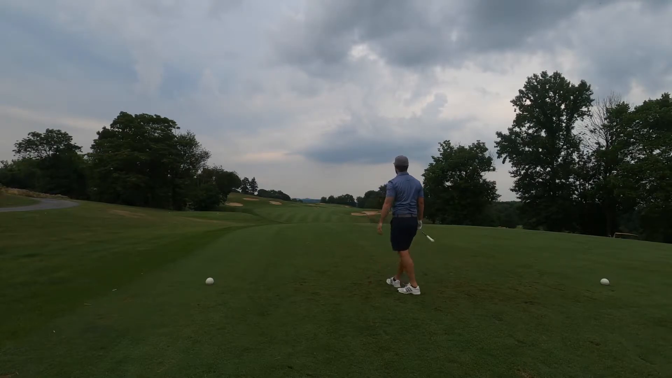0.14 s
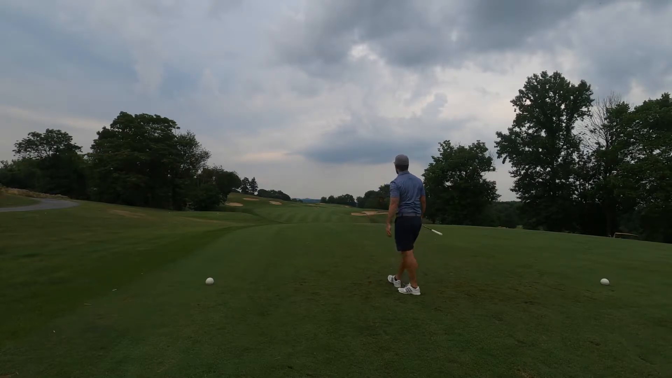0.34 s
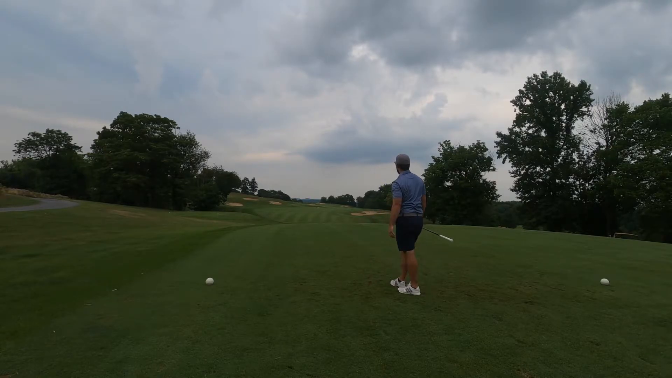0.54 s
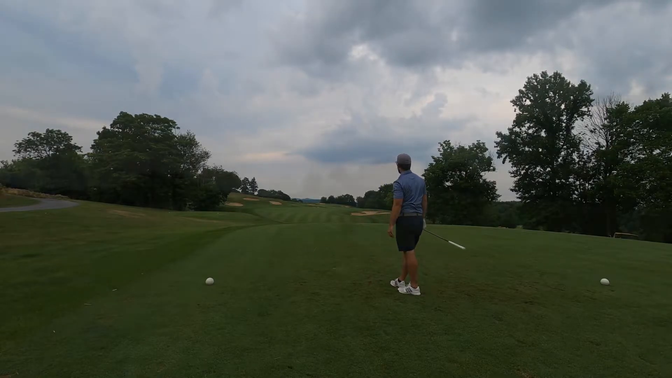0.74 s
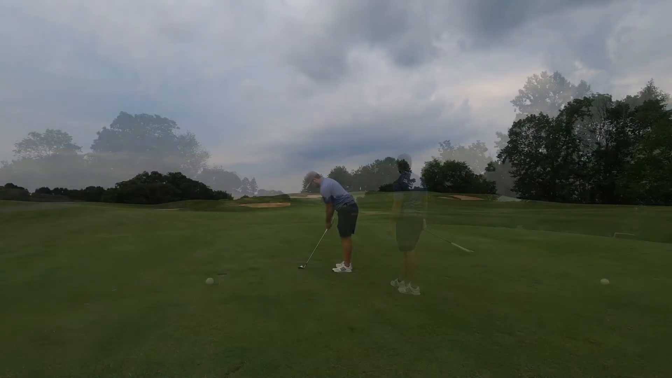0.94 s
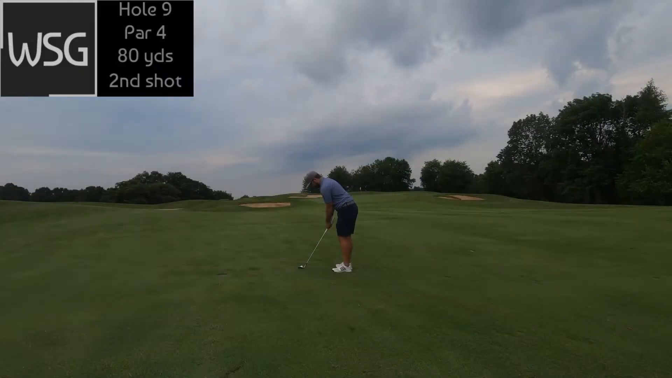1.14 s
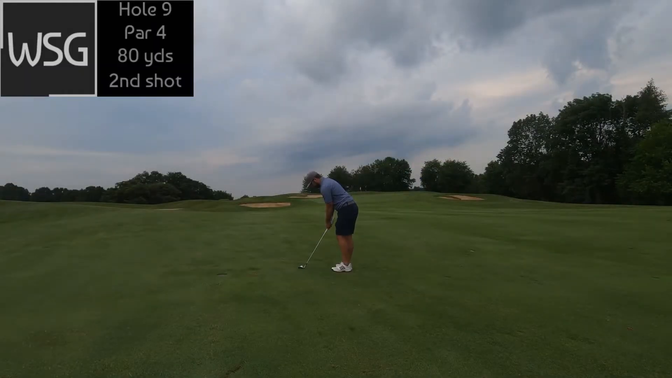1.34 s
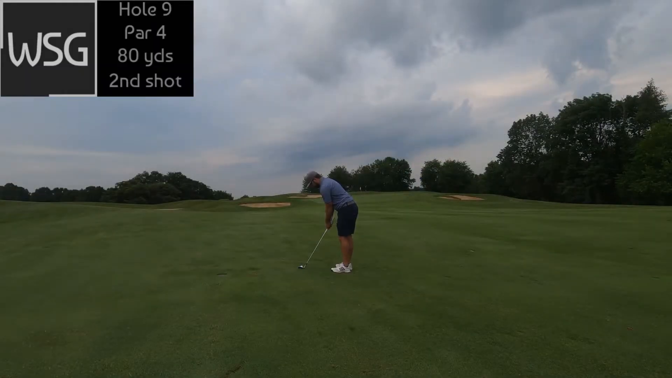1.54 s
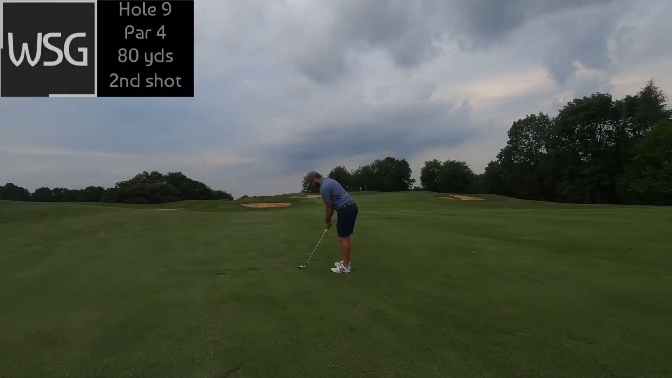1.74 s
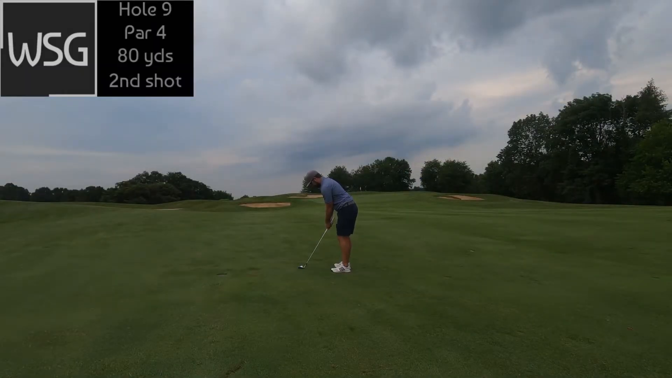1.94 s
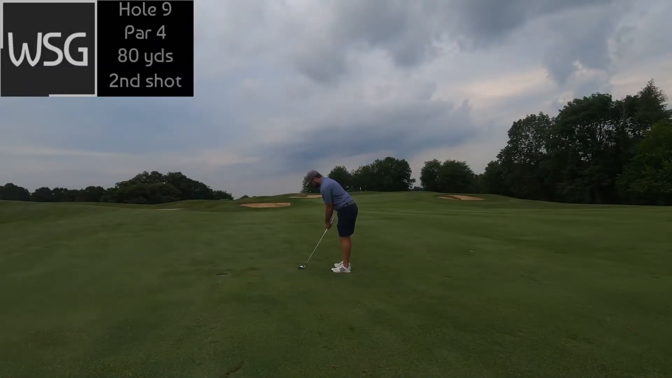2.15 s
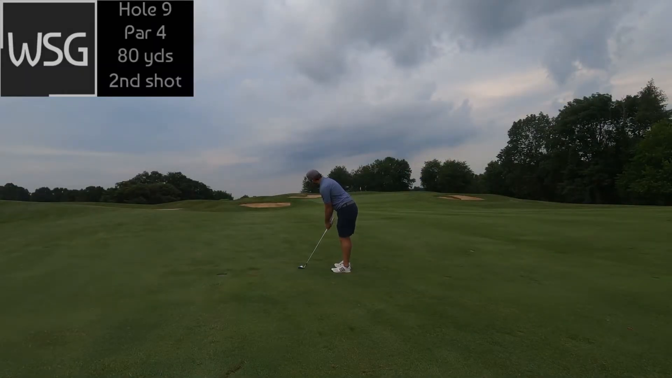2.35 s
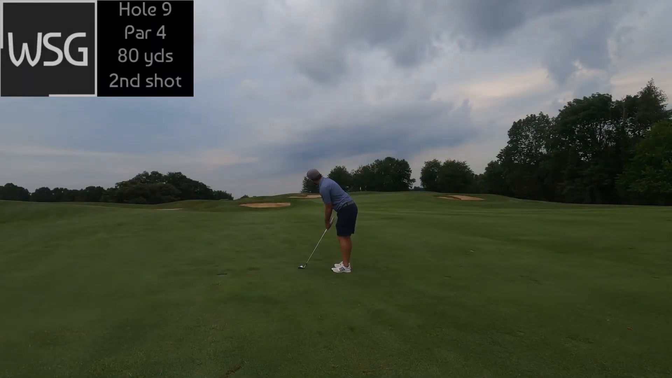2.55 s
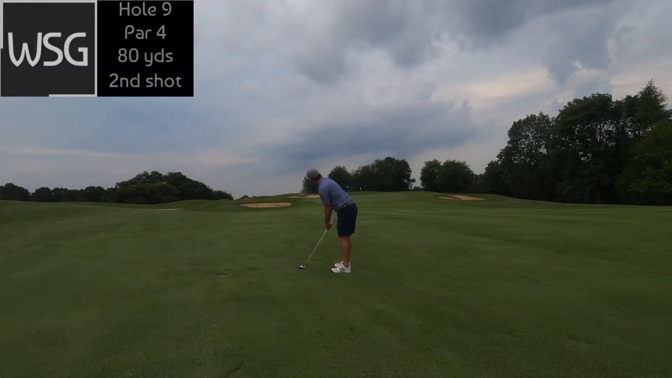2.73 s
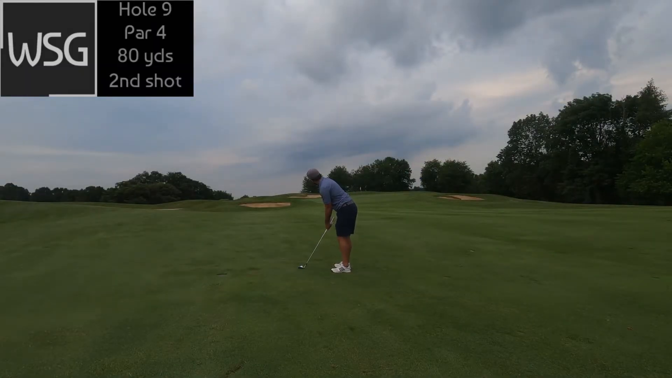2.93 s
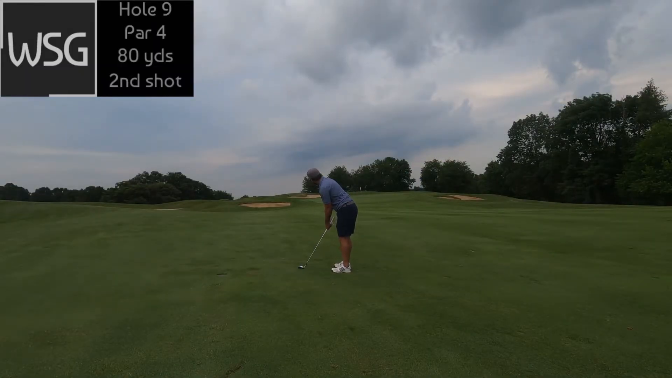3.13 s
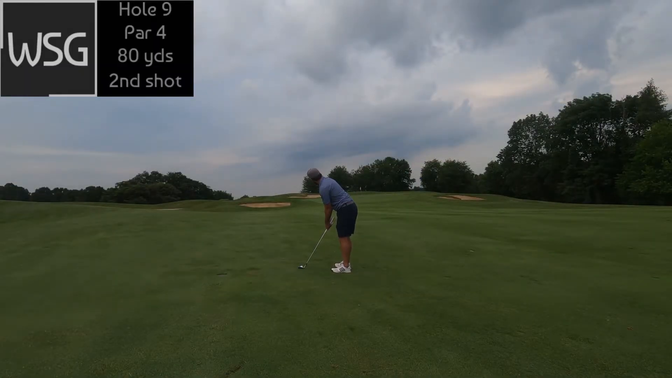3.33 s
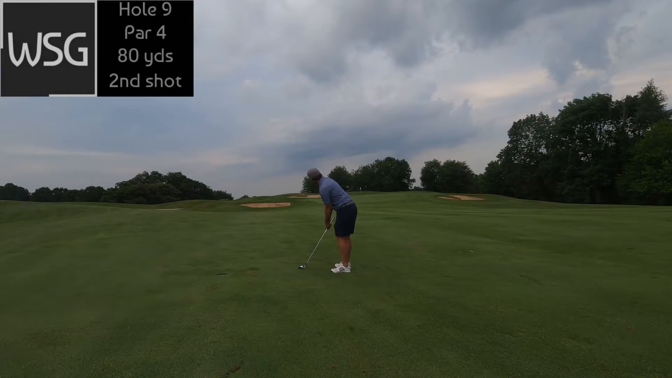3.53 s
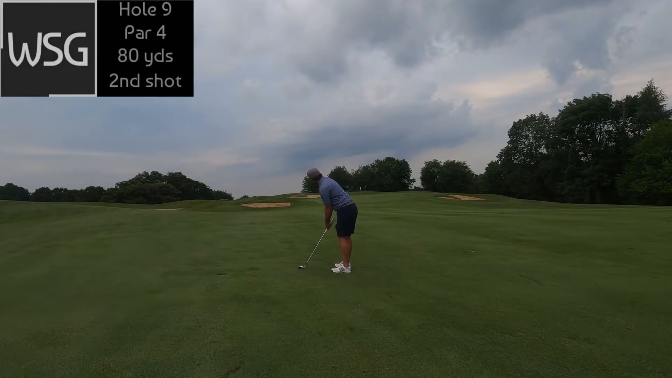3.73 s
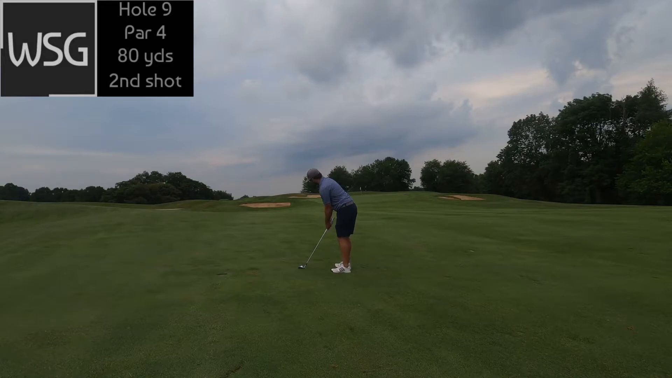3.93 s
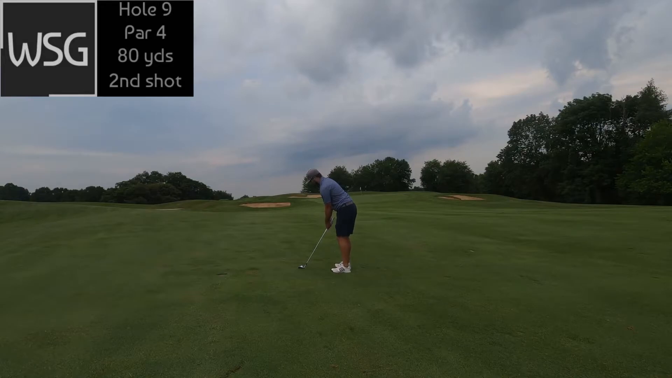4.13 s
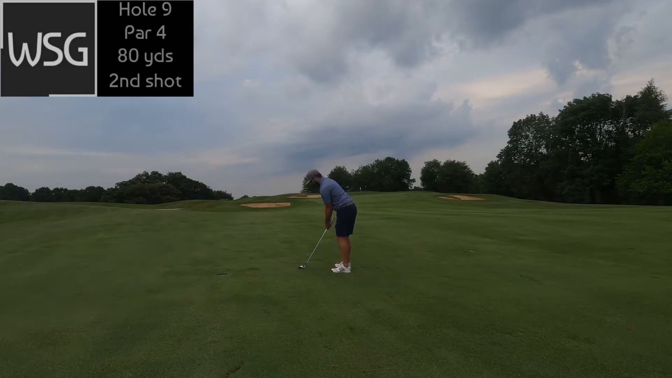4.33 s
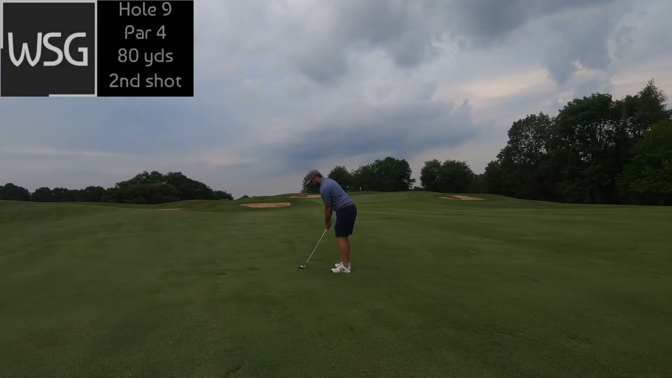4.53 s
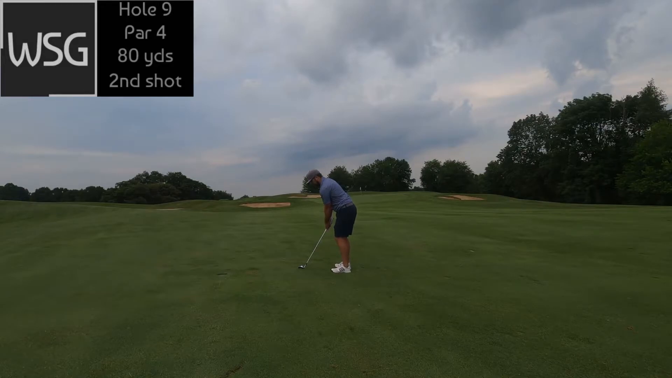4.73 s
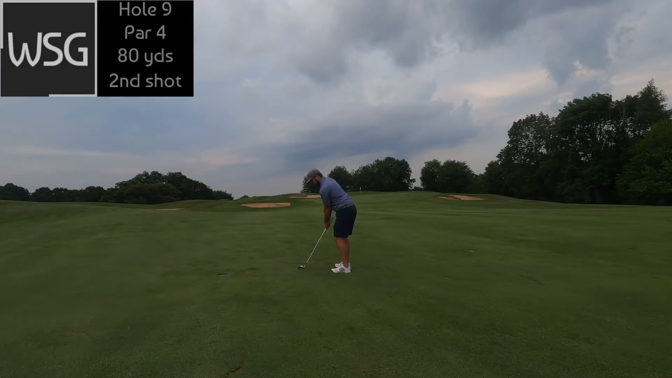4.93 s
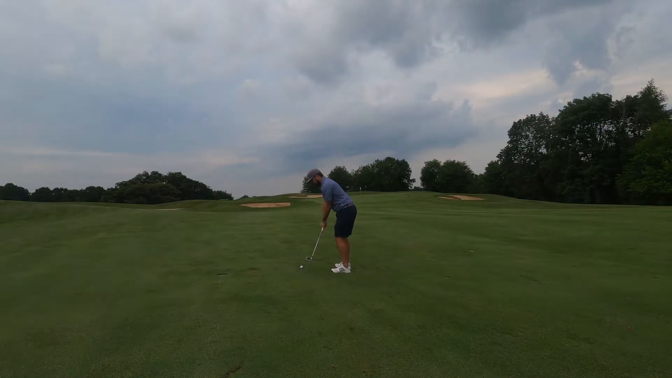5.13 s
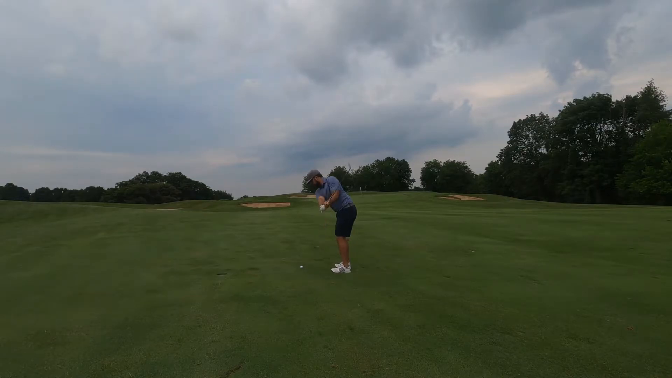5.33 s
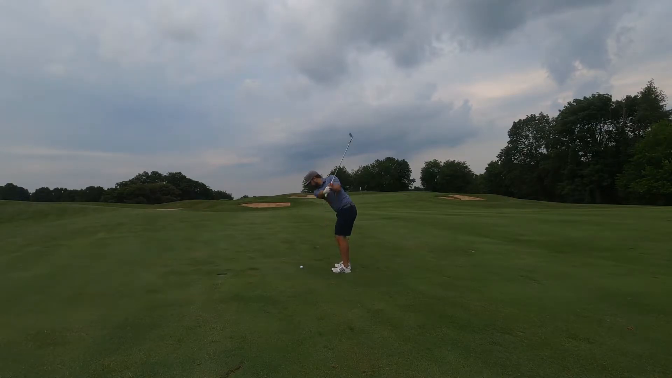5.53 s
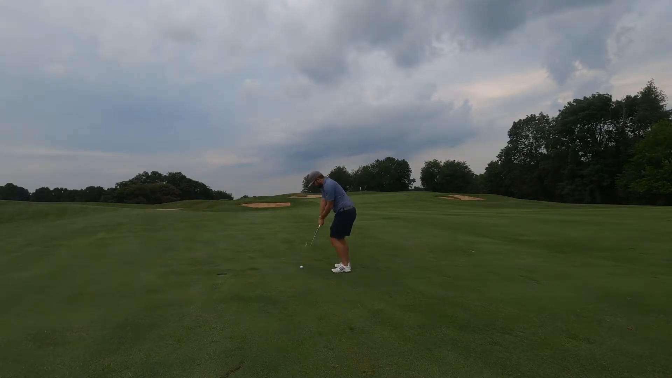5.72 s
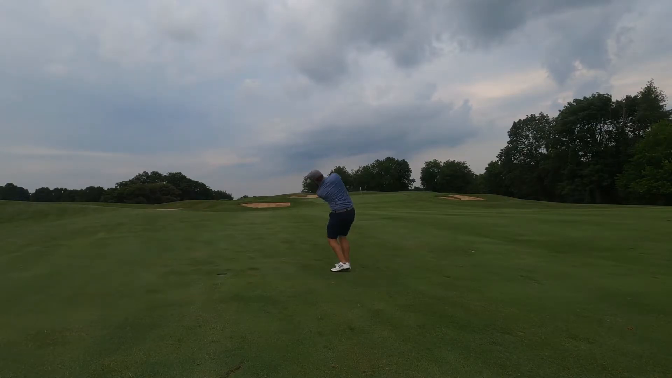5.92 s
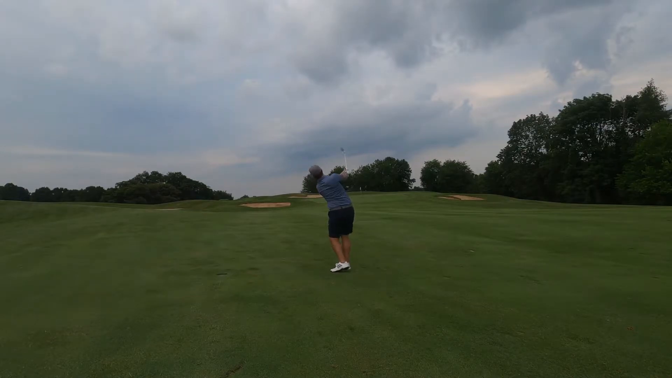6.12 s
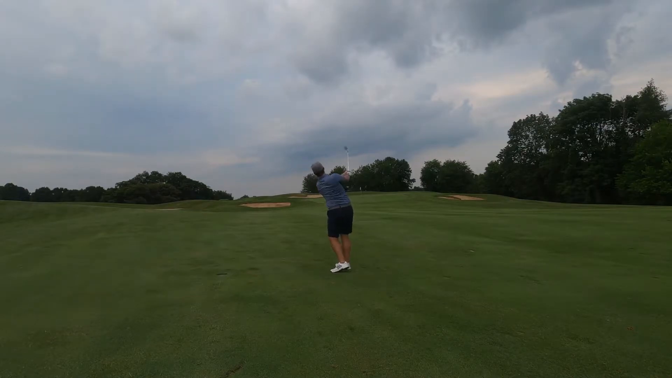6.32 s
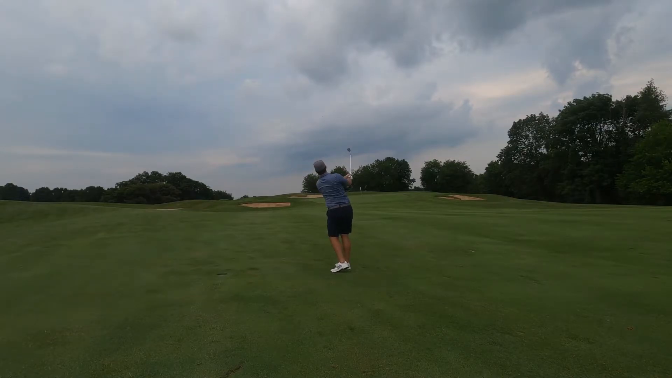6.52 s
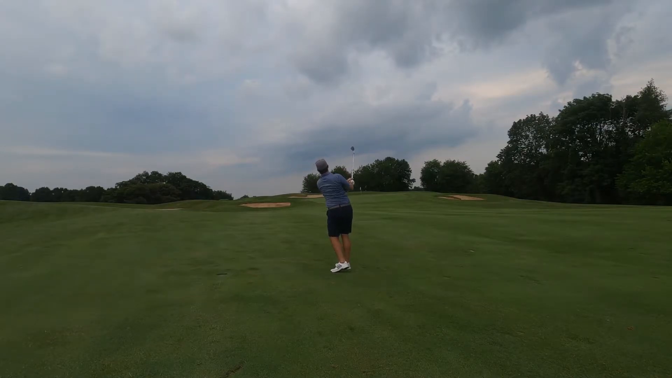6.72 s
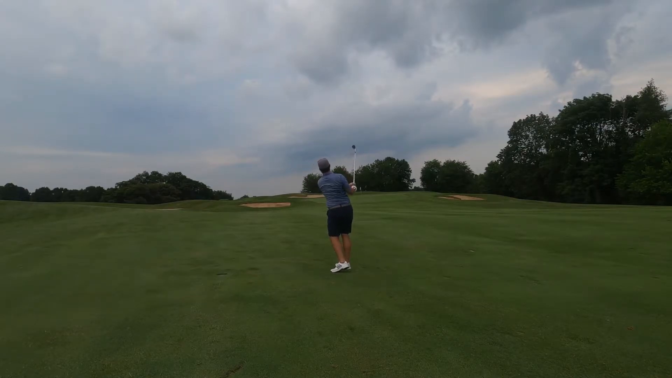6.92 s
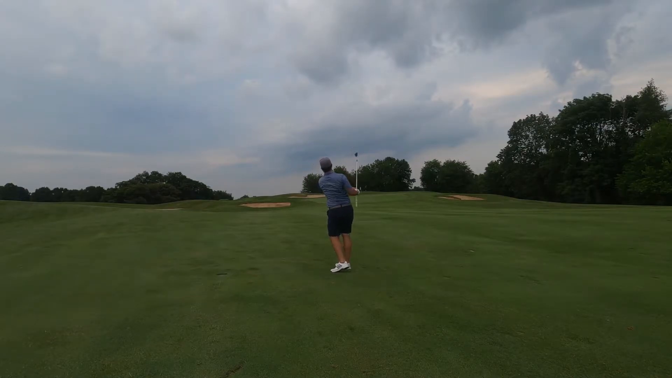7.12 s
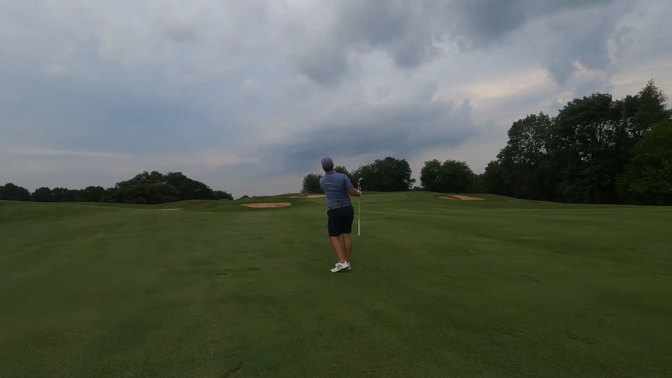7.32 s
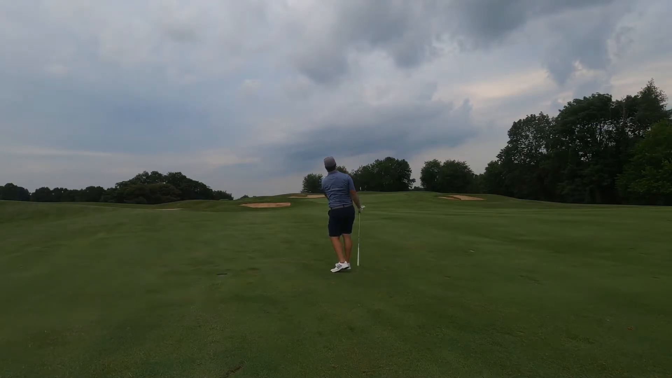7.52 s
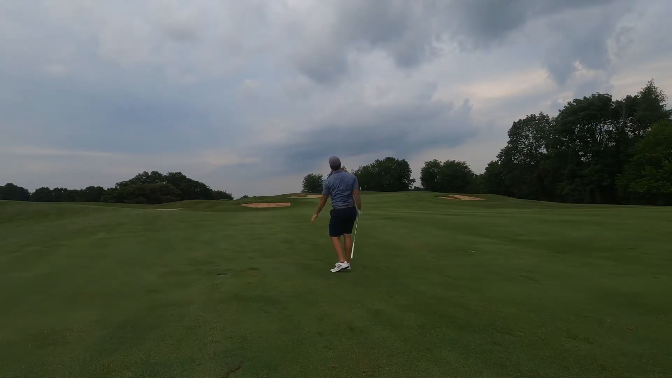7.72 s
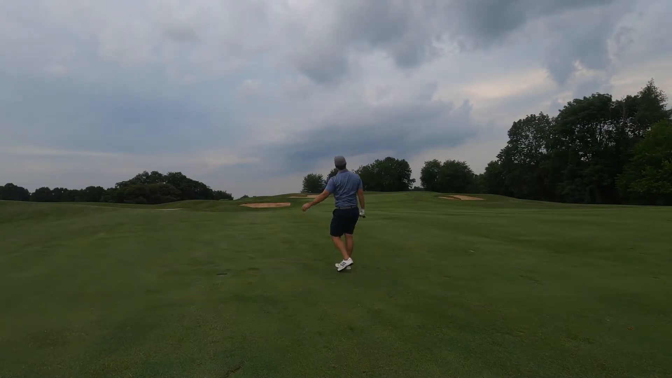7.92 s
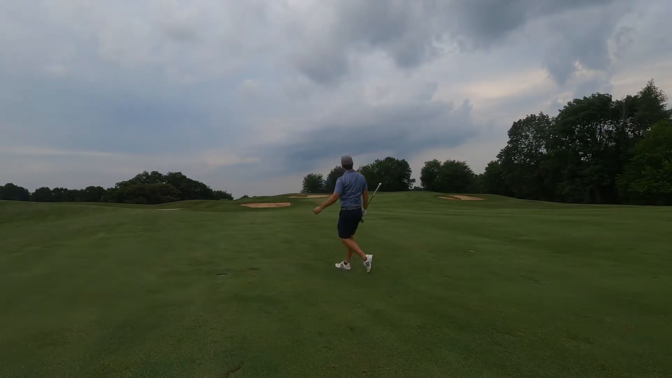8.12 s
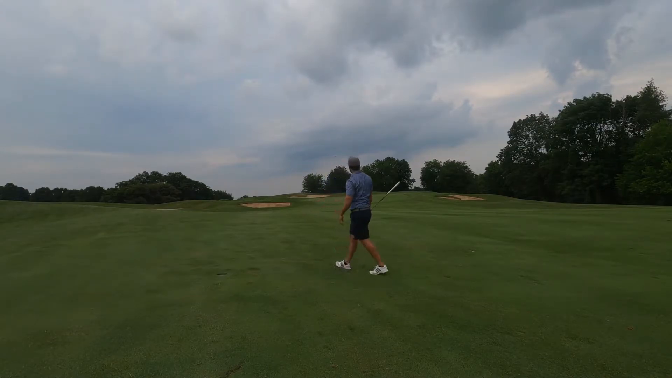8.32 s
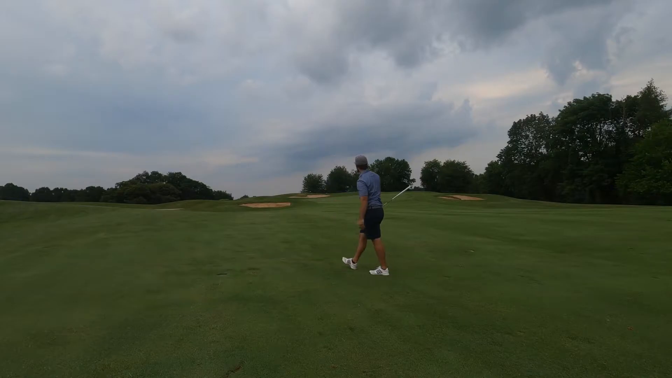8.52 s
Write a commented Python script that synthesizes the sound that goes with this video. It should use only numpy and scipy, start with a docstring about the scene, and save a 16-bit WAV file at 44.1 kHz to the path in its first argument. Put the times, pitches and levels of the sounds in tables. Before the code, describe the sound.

Low microphone wind and distant engine drone, sparse bird calls, then one sharp golf shot with a short turf thud and soft brushing afterward.

```python
"""An iron swishes down, strikes the golf ball with one crisp click and cuts through the turf; shoes and clothes brush.
The click is a short contact pulse, decaying sine modes and noise bursts; the swish is noise swelling to the strike.
Around it lies an open course: wind rumbles on the microphone, a far roar and leaves hiss (coloured noise),
two far mowers drone (harmonics of their firing rates), faint tones whine, and birds whistle, rattle and trill.
"""
import sys
import numpy as np
from scipy import signal
from scipy.fft import rfft, irfft, next_fast_len
from scipy.io import wavfile

SR = 44100
rng = np.random.default_rng(int(sys.argv[2]) if len(sys.argv) > 2 else 0)


def wrap_up_sound(samples):
    """Save the sound to the file named by the first command line argument, as 16-bit audio."""
    columns = np.atleast_2d(samples).T
    # keep every value between -1 and 1, then stretch to whole-number steps
    tamed = np.clip(columns, -1, 1)
    steps = np.round(tamed * 32767).astype(np.int16)
    wavfile.write(sys.argv[1], SR, steps)


N = 377485
TIME_S = np.arange(N) / SR

# Wind on the microphone. Each row: time in seconds, slow buffeting level in dB, rumble level in dB.
GUST = [(0.05, -34.5, -57), (.45, -40, -53), (.75, -36.5, -53.5), (1.0, -55.5, -57.5), (1.2, -45, -54),
        (1.8, -41, -55.5), (2.6, -53, -55.5), (3.4, -50.5, -54), (3.9, -47, -57), (4.8, -56, -58.5),
        (5.55, -51, -56), (6.1, -55, -57), (6.85, -54, -54.7), (7.6, -46, -55), (8.56, -45, -56)]
# Colour of the wind rumble. Each row: frequency in Hz, relative density in dB per Hz.
RUMBLE_COLOUR = [(20, -4.5), (35, -3), (60, -3.5), (110, -0.5), (160, -8), (215, -10), (320, -21),
                 (420, -38), (900, -49)]

# Level of the distant roar. Each row: time in seconds, level in dB.
ROAR_LEVEL = [(0, -72.5), (.6, -73), (.85, -80), (1.05, -70.5), (3.6, -68.5), (4.4, -69.8), (8.56, -69)]
# Colour of the roar. Each row: frequency in Hz, relative density in dB per Hz.
ROAR_COLOUR = [(150, -6), (400, -1), (600, 1), (800, 3), (1100, -0.5), (1500, -5), (2100, -10.5),
               (2800, -14), (5000, -41.5)]
# Colour of the leaves. Each row: frequency in Hz, relative density in dB per Hz.
LEAVES_COLOUR = [(1000, -2.5), (2800, 4), (4500, 0.5), (6500, 0.5), (8500, -2.5), (11000, -5), (15500, -6)]
LEAVES_DB, LEAVES_FOLLOW = -73.5, 0.13  # level at mean roar; share of the roar's dB swing
# Breeze sighing in the trees. Each row: time in seconds, level in dB.
BREEZE_LEVEL = [(0, -79.5), (2.2, -78.5), (3.6, -78.5), (4.2, -95), (6.3, -74.5), (8.1, -71.5), (8.56, -77)]
# Colour of the sigh. Each row: frequency in Hz, relative density in dB per Hz.
SIGH_COLOUR = [(700, -16.5), (1300, -2.5), (1700, 1.5), (2300, -3), (3500, -10), (7000, -10)]

# Lower distant mower. Each row: time in seconds, firing rate in Hz, level in dB.
LOW_MOWER = [(0, 48.4, -55), (1.9, 48.5, -56), (2.2, 48.5, -62), (2.6, 48.4, -56), (3.7, 48, -56),
             (4.2, 48, -68), (8.56, 48, -76)]
# Its harmonics. Each row: multiple of the firing rate, relative level in dB.
LOW_ORDERS = [(1, -3.5), (2, -10.5), (3, -5.5), (4, -5), (5, -18), (6, -17), (6.5, -12), (8.5, -21)]
# Higher distant mower. Each row: time in seconds, firing rate in Hz, level in dB.
HIGH_MOWER = [(0, 72, -52.5), (.8, 71.84, -61), (1.1, 76.34, -66.5), (4, 78.95, -64), (5, 80.4, -60),
              (6, 80.56, -58.5), (7.6, 80.8, -63.5), (8.56, 80.56, -61.5)]
# Its harmonics. Each row: multiple of the firing rate, relative level in dB.
HIGH_ORDERS = [(.5, -7), (1, -2.5), (2, -7.5), (3, -16.5)]
# Carry of overtones and engine noise over open ground. Each row: time in seconds, gain in dB.
CARRY = [(0, -4), (.75, 1.5), (1.05, -10.5), (3.5, -15), (4.2, -30), (8.56, -17)]
# Colour of the engine noise. Each row: frequency in Hz, relative density in dB per Hz.
ENGINE_COLOUR = [(100, -12), (200, -6.5), (310, -0.5), (420, -2.5), (550, -10), (800, -12.5), (1500, -31.5)]

# Faint whines of far machinery and tyres. Each row: middle in seconds, half length in seconds,
# centre frequency in Hz, level in dB.
WHINES = [(.4, .5, 808, -79), (2.1, 0.98, 1155, -80), (3.2, 0.28, 1113, -81), (4.0, .25, 1170, -80),
          (4.4, .2, 720, -76.5), (4.65, 0.3, 810, -76), (8.45, 0.36, 1018, -74)]

# Plain whistles and chips. Each row: start in seconds, length in seconds, middle pitch in Hz,
# glide in octaves, level in dB.
WHISTLES = [(.09, .048, 3500, 0, -79), (.683, .082, 5700, 0, -77), (2.239, .06, 2340, .08, -75),
            (2.345, .045, 2315, -0.045, -72), (2.399, .04, 2850, .25, -72), (2.43, .07, 2230, -.1, -76),
            (2.995, .026, 2460, -0.33, -68), (3.975, .018, 2750, -.1, -69), (4.023, .022, 2730, -.03, -70),
            (4.065, .1, 2750, -0.011, -70), (5.928, .025, 3260, .2, -74), (5.954, .051, 2600, -.15, -67.5),
            (6.325, .076, 2680, -0.042, -70.5), (6.442, .045, 2120, -.08, -72),
            (6.524, .055, 5790, 0, -72.5), (6.578, .035, 4550, 0, -78), (6.915, .055, 5670, -.03, -75.5),
            (6.973, .04, 4500, 0, -78), (7.265, 0.031, 3870, -.29, -73), (7.414, .028, 5000, -.04, -68),
            (7.425, .02, 3550, -.34, -72), (7.559, 0.051, 3850, -.54, -69.5), (7.578, .05, 5130, 0, -70),
            (7.674, 0.076, 4100, -.44, -72), (8.112, .075, 6980, -.01, -73), (8.40, .075, 3470, 0, -73.5),
            (8.482, 0.074, 7400, .03, -72), (8.526, .022, 6720, -.01, -69.5)]
WHISTLE_ARCH_OCT = .012  # droop at the ends of a note
# Warbles, bending up, then down, then back. Each row: start in seconds, length in seconds,
# centre pitch in Hz, level in dB.
WARBLES = [(1.40, .065, 6870, -75), (1.403, .06, 3080, -77), (1.567, .065, 7300, -77),
           (1.607, .078, 3090, -75), (1.802, .068, 3060, -78), (2.936, .06, 3080, -69),
           (3.12, .058, 3010, -70)]
WARBLE_SWING, WARBLE_TURNS = .062, .95  # share of the pitch; bend cycles per note
FAR_NOTES, FAR_NOTE_S, FAR_NOTE_DB, FAR_LOW_HZ, FAR_HIGH_HZ = 4, 0.045, -82, 2400, 7800
QUAVER_HZ, BEND_QUAVER = 13, .1  # unsteadiness of every note; extra share of its pitch range

# Shoes and clothes brushing. Each row: middle in seconds, level in dB, half length in seconds.
SCUFFS = [(.26, -73, 0.027), (0.449, -74, .02), (.61, -73, .02), (1.462, -70, .008), (2.55, -75, .03),
          (4.865, -75, .035), (7.03, -75, .04), (7.32, -74.5, 0.054), (7.45, -70.5, 0.029),
          (7.57, -72, 0.057), (8.277, -63, 0.0077), (8.474, -72, 0.015)]
# Colour of the brushed grass. Each row: frequency in Hz, relative density in dB per Hz.
GRASS_COLOUR = [(1200, -7), (3500, 4.5), (5500, 0), (8000, -4), (13000, -29)]

# Bouts of a dry rattle far off in the trees. Each row: middle in seconds, half length in seconds,
# centre frequency in Hz, level in dB.
RATTLES = [(1.22, 0.23, 2140, -80), (7.4, .75, 1705, -75.5)]

# Partials of the blackbird's reedy note. Each row: multiple of the base pitch, relative level in dB.
REED_PARTIALS = [(5, -17), (6, 0), (7, -18), (8, -19), (9, -10), (10, -21)]
REED_START_S, REED_END_S, REED_ATTACK_S, REED_RELEASE_S, REED_DB = 3.658, 3.775, 0.015, 0.045, -64
REED_HZ, REED_RISE_HZ_PER_S, REED_LIFT_HZ, REED_LIFT_S = 550, 80, 7, .025  # base pitch, at multiple 1
REED_OPENS_S, REED_DARK_DB = .06, 3.5  # outer partials swell in; initial loss per multiple
# Bands swept by the trill. Each row: centre in Hz, sweep either way in Hz, relative level in dB.
TRILL_BANDS = [(2960, 240, -3), (3500, 230, -1), (4650, 260, -3)]
TRILL_START_S, TRILL_END_S, TRILL_ATTACK_S, TRILL_RELEASE_S, TRILL_DB = 3.80, 4.11, .025, .035, -67.5

STRIKE_S = 5.855
SWISH_DB, SWISH_RISE_DB_PER_S, SWISH_HOLD_S, SWISH_FALL_DB_PER_S = -54.5, 160, 0.019, 550
# Colour of the swish. Each row: frequency in Hz, relative density in dB per Hz.
SWISH_COLOUR = [(150, -3.5), (400, 8.5), (900, 2.5), (1600, -1), (3000, -8.5), (7000, -14), (15000, -24)]
CONTACT_S, CONTACT_DB = .0005, -17  # time squashed on the face; pulse height before the band-pass
# Modes of club head and ball, before the turf chokes them. Each row: frequency in Hz, level in dB,
# t60 in seconds.
STRIKE_MODES = [(338, -30.3, 0.0438), (471, -28.1, 0.042), (661, -29.4, 0.0595), (744, -25.9, 0.0426),
                (891, -8.5, 0.0074), (1209, -18.8, 0.0218), (1363, -14.2, 0.0152), (1624, -7.6, 0.0074),
                (1960, -22.4, 0.026), (2261, -19.0, 0.0152), (3189, -24.0, 0.0157), (3578, -28.3, 0.0311),
                (3865, -30.4, 0.0186), (5105, -17.6, 0.0059), (5579, -22.6, 0.0177), (5971, -19.8, 0.0059),
                (7180, -35.8, 0.0055), (7508, -27.5, 0.0343), (7512, -15.6, 0.0092), (8110, -21.2, 0.0074),
                (8920, -28.4, 0.0103), (9279, -26.9, 0.0339), (9329, -18.1, 0.0074), (11128, -33.0, 0.0106),
                (11696, -38.8, 0.041), (12890, -31.8, 0.0096), (14138, -38.6, 0.0385)]
# Face crack, then blade in the turf, before the choke. Each row: delay in seconds, low edge in Hz,
# high edge in Hz, level in dB, t60 in seconds.
STRIKE_BURSTS = [(0, 5070, 14000, -28, 0.0063), (.001, 2000, 14900, -34, 0.064),
                 (.0055, 301, 900, -25.5, 0.022), (.0065, 5060, 10200, -42, .02)]
CUTOFF_HZ = 15750


def from_db(db):
    """Decibels to gain."""
    return 10 ** (np.asarray(db) / 20)


def rms_one(x):
    """Scale to unit power."""
    return x / np.sqrt(np.mean(x ** 2) + 1e-20)


def in_time(rows):
    """Interpolate each column of a curve at every sample."""
    s, *columns = np.transpose(rows)
    return [np.interp(TIME_S, s, column) for column in columns]


def noise(colour_rows):
    """Unit-power noise of the given colour, falling 20 dB per octave faster beyond its ends."""
    hz, db = np.transpose(colour_rows)
    size = next_fast_len(N)
    octave = np.log2(np.maximum(np.arange(size // 2 + 1), 1) * SR / size)
    outside = np.abs(octave - np.clip(octave, np.log2(hz[0]), np.log2(hz[-1])))
    colour_db = np.interp(octave, np.log2(hz), db) - 20 * outside
    spectrum = rfft(rng.standard_normal(size)) * from_db(colour_db)
    return rms_one(irfft(spectrum, size)[:N])


def drift(rate_hz):
    """Smooth random signal of spread 1, changing about rate_hz times a second."""
    return noise([(rate_hz / 10, 0), (rate_hz, 0)])


def band(x, low_hz, high_hz):
    """Causal band-pass."""
    edges_hz = [low_hz, min(high_hz, SR / 2 - 1000)]
    return signal.sosfilt(signal.butter(2, edges_hz, "band", fs=SR, output="sos"), x)


def decay(start_s, t60_s):
    """Time since a blow, and its exponential decay."""
    age_s = np.maximum(TIME_S - start_s, 0)
    fading = (TIME_S >= start_s) * 1000.0 ** -np.minimum(age_s / t60_s, 10)
    return age_s, fading


def turn(hz):
    """Running phase of a changing frequency."""
    return 2 * np.pi * np.cumsum(hz) / SR


def swell(middle_s, half_s):
    """Gaussian rise and fall."""
    return np.exp(-((TIME_S - middle_s) / half_s) ** 2)


def held(start_s, end_s, attack_s, release_s):
    """Attack, hold until the end, release."""
    attack = np.clip((TIME_S - start_s) / attack_s, 0, 1)
    release = np.clip(1 - (TIME_S - end_s) / release_s, 0, 1)
    return attack * release


def wind(lumpy_db=1.7, flutter_db=0.6):
    """Large eddies push slowly on the diaphragm; small ones rumble."""
    buffet_db, rumble_db = in_time(GUST)
    buffet_colour = [(3, 4.0), (7, 4.0), (14, -13.0), (22, -22.5), (35, -29.5)]  # (Hz, dB per Hz)
    buffet = from_db(buffet_db + lumpy_db * drift(4)) * noise(buffet_colour)
    rumble = from_db(rumble_db + flutter_db * drift(7.9)) * noise(RUMBLE_COLOUR)
    return buffet + rumble


def open_air():
    """A far roar, with leaves and a breeze in the tree line, all coloured noise."""
    roar_db, = in_time(ROAR_LEVEL)
    breeze_db, = in_time(BREEZE_LEVEL)
    roar = from_db(roar_db + .4 * drift(8)) * noise(ROAR_COLOUR)
    leaves_db = LEAVES_DB + LEAVES_FOLLOW * (roar_db - roar_db.mean())
    leaves = from_db(leaves_db) * noise(LEAVES_COLOUR)
    breeze = from_db(breeze_db) * noise(SIGH_COLOUR)
    return roar + leaves + breeze


def mower(curve, orders, overtone_db, waver_db, wobble):
    """Multiples of the firing rate, each fading in and out in the moving air."""
    hz, level_db = in_time(curve)
    phase = turn(hz * (1 + wobble * drift(4.4)))
    lines = np.zeros(N)
    for multiple, db in orders:
        line_db = db + overtone_db * (multiple > 1) + waver_db * drift(2.9)
        lines += from_db(line_db) * np.sin(multiple * phase + rng.uniform(0, 2 * np.pi))
    return np.sqrt(2) * from_db(level_db) * lines


def mowers():
    """Two engines drone; the lower one's overtones and the engine noise share one carry curve."""
    carry_db, = in_time(CARRY)
    low = mower(LOW_MOWER, LOW_ORDERS, carry_db, waver_db=1.2, wobble=.003)
    high = mower(HIGH_MOWER, HIGH_ORDERS, 0, waver_db=1.8, wobble=.006)
    engine_noise = from_db(carry_db - 66.5) * noise(ENGINE_COLOUR)
    return low + high + engine_noise


def whines(wander_hz=9, waver_db=2.0):
    """Narrow tones, wandering together in pitch, swell and fade."""
    wander = wander_hz * drift(25)
    tones = np.zeros(N)
    for middle_s, half_s, hz, db in WHINES:
        tones += from_db(db) * swell(middle_s, half_s) * np.sin(turn(hz + wander))
    return np.sqrt(2) * tones * from_db(waver_db * drift(10))


def add_note(out, start_s, length_s, pitch, db, quaver):
    """One near sine under a rounded envelope; pitch maps progress 0-1 to Hz, wide bends quaver more."""
    at = np.flatnonzero((TIME_S >= start_s) & (TIME_S < start_s + length_s))
    along = (TIME_S[at] - start_s) / length_s
    hz = pitch(along)
    hz = hz + (QUAVER_HZ + BEND_QUAVER * np.ptp(hz)) * quaver[at]
    envelope = np.sqrt(2 * np.abs(np.sin(np.pi * along)))
    out[at] += from_db(db) * envelope * np.sin(turn(hz))


def whistles():
    """Small birds warble and whistle in gliding sines; fainter ones call at random farther off."""
    out, quaver = np.zeros(N), drift(203)
    for start_s, length_s, hz, db in WARBLES:
        def warble_hz(u):
            return hz * (1 + WARBLE_SWING * np.sin(2 * np.pi * WARBLE_TURNS * u))
        add_note(out, start_s, length_s, warble_hz, db, quaver)
    far = []
    for when, high, fall in rng.random(size=(FAR_NOTES, 3)):
        far_hz = FAR_LOW_HZ * (FAR_HIGH_HZ / FAR_LOW_HZ) ** high
        far.append((when * (TIME_S[-1] - FAR_NOTE_S), FAR_NOTE_S, far_hz, -.15 * fall, FAR_NOTE_DB))
    for start_s, length_s, hz, glide_oct, db in WHISTLES + far:
        def whistle_hz(u):
            return hz * 2 ** (glide_oct * (u - .5) - WHISTLE_ARCH_OCT * (2 * u - 1) ** 2)
        add_note(out, start_s, length_s, whistle_hz, db, quaver)
    return out


def among_trees(x, t60_s=0.41, wet_db=-5):
    """Trunks and leaves scatter a short, diffuse tail: decaying noise as impulse response."""
    age_s = TIME_S[:SR // 2]
    tail = rng.standard_normal(len(age_s)) * np.exp(-np.log(1000) * age_s / t60_s)
    return x + from_db(wet_db) * signal.fftconvolve(x, tail / np.linalg.norm(tail))[:N]


def scuffs(grain_db=6.5):
    """Soft brushes of grass and cloth: noise made grainy by fast level changes."""
    pressure = sum(from_db(db) * swell(middle_s, half_s) for middle_s, db, half_s in SCUFFS)
    return pressure * rms_one(noise(GRASS_COLOUR) * from_db(grain_db * drift(200)))


def rattle(width_hz=240):
    """Quick dry pulses on tones, blurred by distance into narrow noise bands."""
    rate_hz, pulse_db, pulse_s = 20.1, 12, 7.445  # level swings pulse_db either way; one peak time
    pulses = rms_one(from_db(pulse_db * np.cos(2 * np.pi * rate_hz * (TIME_S - pulse_s))))
    bouts = np.zeros(N)
    for middle_s, half_s, hz, db in RATTLES:
        bouts += from_db(db) * swell(middle_s, half_s) * np.sin(2 * np.pi * hz * TIME_S)
    return np.sqrt(2) * pulses * drift(width_hz) * bouts


def blackbird(rasp_hz=150, uneven_db=3.0):
    """A held reedy note of harmonics lifts at its end, then a fast trill of rasping sweeps follows."""
    lift_hz = REED_LIFT_HZ * np.clip((TIME_S - REED_END_S) / REED_LIFT_S, 0, 1)
    phase = turn(REED_HZ + REED_RISE_HZ_PER_S * (TIME_S - REED_START_S) + lift_hz)
    reed = from_db(REED_DB) * held(REED_START_S, REED_END_S, REED_ATTACK_S, REED_RELEASE_S)
    strongest = max(REED_PARTIALS, key=lambda row: row[1])[0]
    dark_db = REED_DARK_DB * np.clip(1 - (TIME_S - REED_START_S) / REED_OPENS_S, 0, 1)
    partials = np.zeros(N)
    for multiple, db in REED_PARTIALS:
        partials += from_db(db - dark_db * abs(multiple - strongest)) * np.sin(multiple * phase)

    trill_hz, throb_db, first_pulse_s = 40, 6, 3.821  # level dips by twice throb_db
    beat = 2 * np.pi * trill_hz * (TIME_S - first_pulse_s)
    trill = from_db(TRILL_DB + throb_db * (np.cos(beat) - 1))
    trill = trill * held(TRILL_START_S, TRILL_END_S, TRILL_ATTACK_S, TRILL_RELEASE_S)
    sweeps = np.zeros(N)
    for centre_hz, sweep_hz, db in TRILL_BANDS:
        hz = centre_hz + sweep_hz * np.sin(beat) + rasp_hz * drift(580)
        sweeps += from_db(db + uneven_db * drift(80)) * np.sin(turn(hz))
    return np.sqrt(2) * (reed * partials + trill * sweeps)


def swish():
    """Air tears past the club head: noise swells to the strike, holds through the turf and dies."""
    before_s = np.maximum(STRIKE_S - TIME_S, 0)
    after_s = np.maximum(TIME_S - STRIKE_S - SWISH_HOLD_S, 0)
    level_db = SWISH_DB - SWISH_RISE_DB_PER_S * before_s - SWISH_FALL_DB_PER_S * after_s
    return from_db(level_db) * noise(SWISH_COLOUR)


def contact(low_hz=2400, high_hz=15000):
    """The ball flattens and springs off the face: one N-shaped pulse, band-passed."""
    along = (TIME_S - STRIKE_S) / CONTACT_S
    pulse = ((along >= 0) & (along < 1)) * (1 - 2 * along)
    return from_db(CONTACT_DB) * band(pulse + 1e-18, low_hz, high_hz)


def strike(thud_hz=135, thud_db=-35, thud_t60_s=.07, thud_delay_s=0.011, buried_s=0.012, choke_t60_s=0.022):
    """Face and ball crack and ring until the blade thuds into the turf and is choked."""
    ring = np.zeros(N)
    for k, (hz, db, t60_s) in enumerate(STRIKE_MODES):
        age_s, fading = decay(STRIKE_S, t60_s)
        ring += (-1) ** k * from_db(db) * fading * np.sin(2 * np.pi * hz * age_s)  # signs alternate
    bursts = np.zeros(N)
    for delay_s, low_hz, high_hz, db, t60_s in STRIKE_BURSTS:
        _, fading = decay(STRIKE_S + delay_s, t60_s)
        grit = rng.choice([-1, 1], N) * np.sqrt(SR / 2 / abs(high_hz - low_hz))  # offsets band-pass loss
        bursts += from_db(db) * band(grit * (fading + 1e-18), low_hz, high_hz)
    buried_for_s, choke = decay(STRIKE_S + buried_s, choke_t60_s)
    age_s, fading = decay(STRIKE_S + thud_delay_s, thud_t60_s)
    thud = from_db(thud_db) * fading * np.sin(2 * np.pi * thud_hz * age_s)
    return (ring + bursts) * np.where(buried_for_s > 0, choke, 1) + thud


def scene():
    """The player close by, the course all around."""
    player = swish() + contact() + strike() + scuffs()
    birds = among_trees(whistles() + blackbird()) + rattle()
    return (player + birds + mowers() + whines() + open_air() + wind())[None]


def record(dry):
    """Steep elliptic low-pass cuts the top."""
    return signal.sosfilt(signal.ellip(10, .1, 80, CUTOFF_HZ, fs=SR, output="sos"), dry)


dry = scene()
out = record(dry)
wrap_up_sound(out)
```